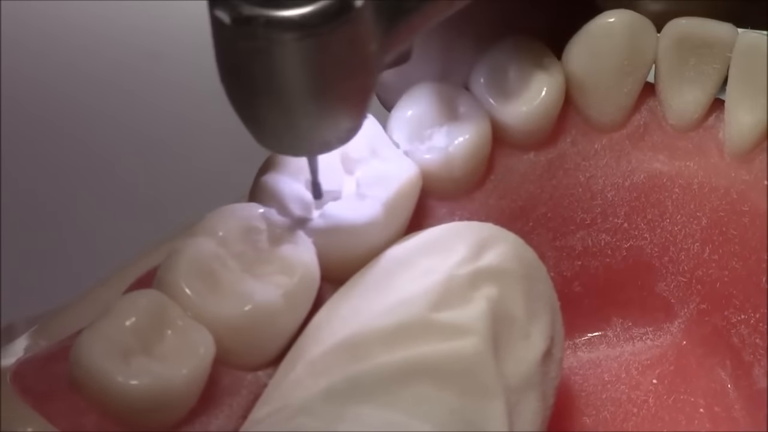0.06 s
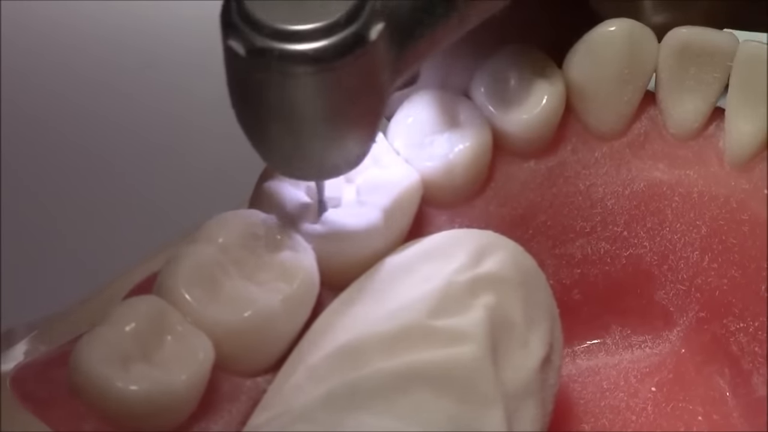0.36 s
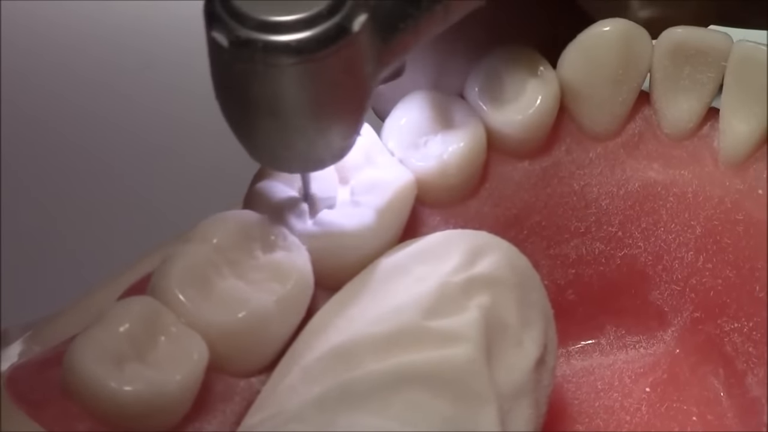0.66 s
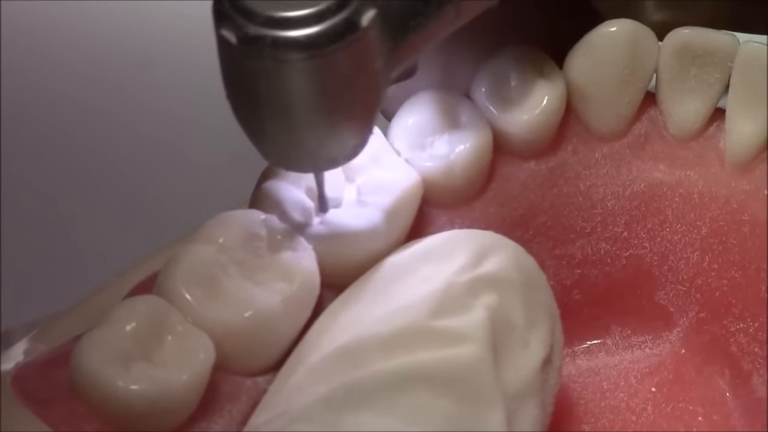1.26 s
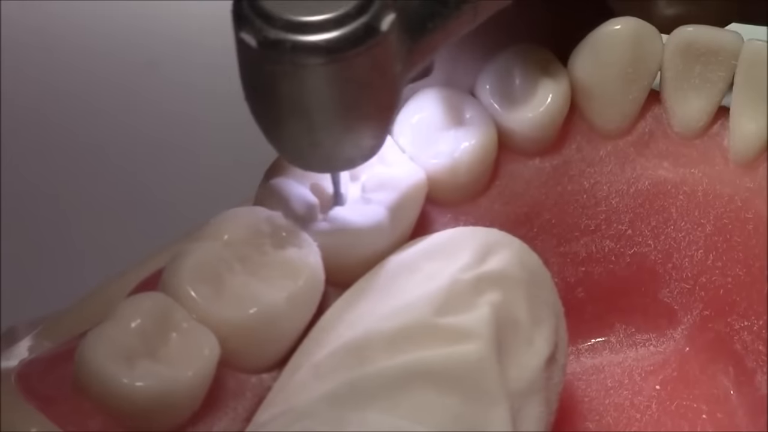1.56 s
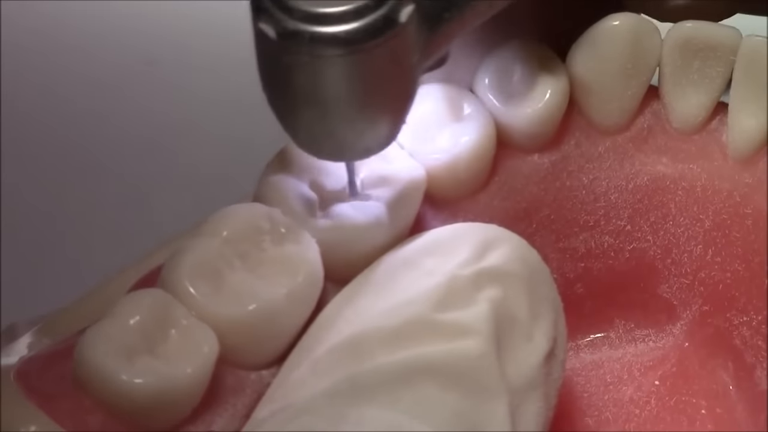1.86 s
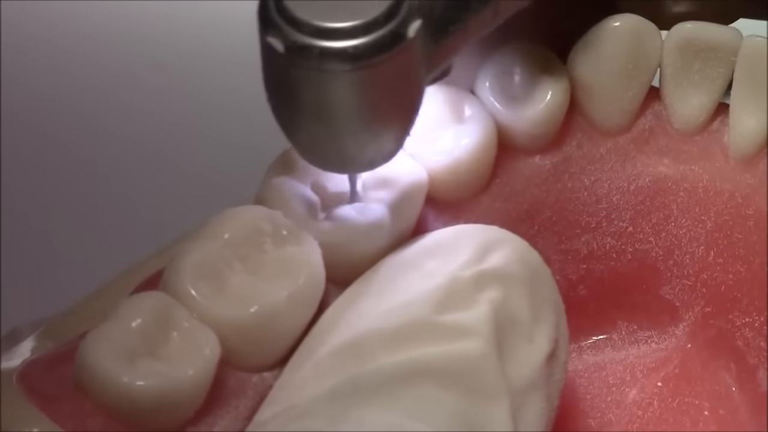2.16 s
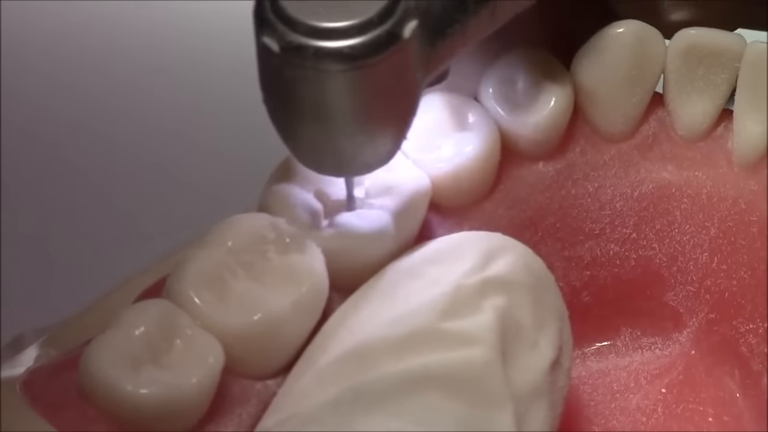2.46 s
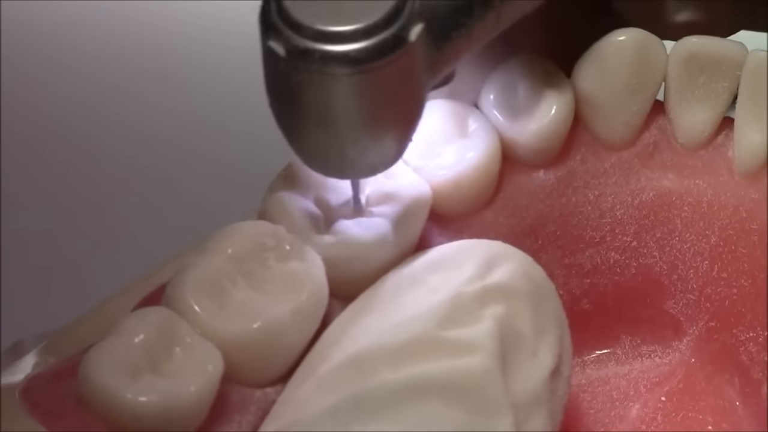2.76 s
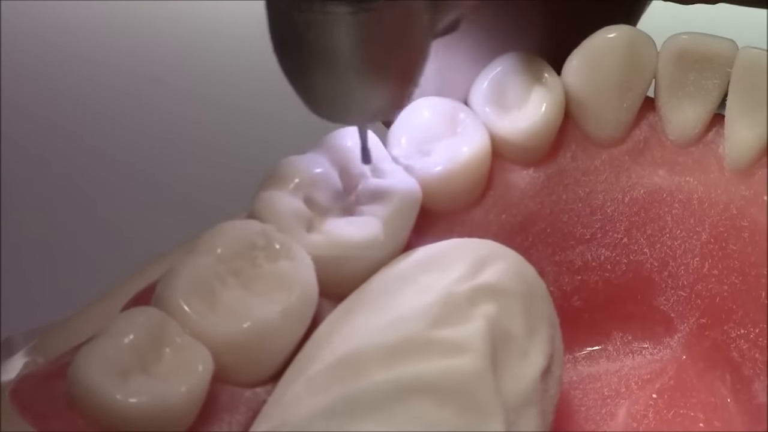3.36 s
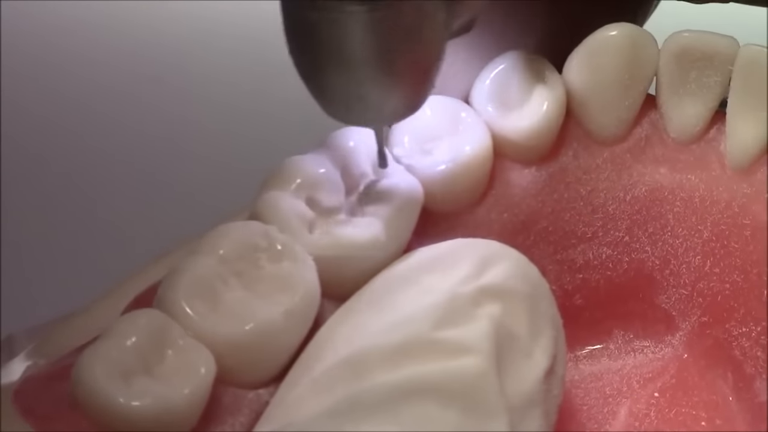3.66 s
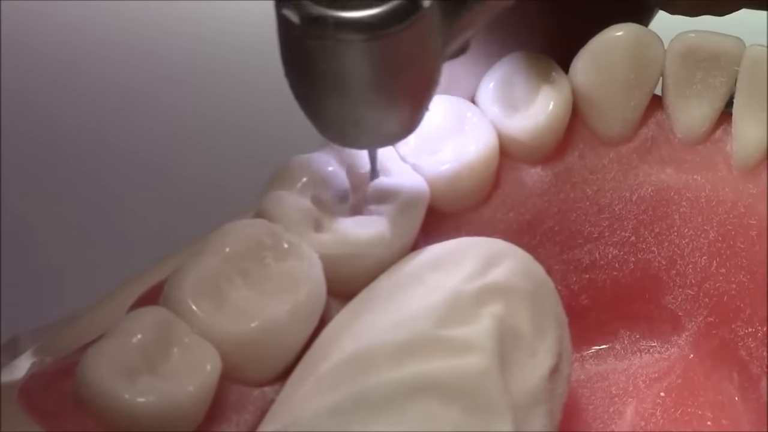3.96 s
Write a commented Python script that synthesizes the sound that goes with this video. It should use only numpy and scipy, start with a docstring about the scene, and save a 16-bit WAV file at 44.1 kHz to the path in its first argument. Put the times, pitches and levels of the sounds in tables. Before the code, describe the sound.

High-pitched dental drill whining and hissing up close, with short grinding bites into a plastic tooth.

```python
"""A high whine near 4.1 kHz with two overtones: an air-turbine dental drill, close to the microphone,
working on a plastic model tooth. Whenever the bur bites, the rotor slows, rings louder and rasps.
Drive air hisses out of the head. Behind it the room carries ventilation and faint machinery,
with a brief low hum early on and one dull knock near the end."""
import sys
import numpy as np
from scipy import signal
from scipy.fft import rfft, irfft
from scipy.io import wavfile

SR = 44100
rng = np.random.default_rng(int(sys.argv[2]) if len(sys.argv) > 2 else 0)


def to_wav(s):
    """Save 16-bit WAV."""
    ch = np.atleast_2d(s).T  # columns
    pcm = np.round(np.clip(ch, -1, 1) * 32767)  # PCM
    wavfile.write(sys.argv[1], SR, pcm.astype(np.int16))


N = 176400
T = np.arange(N) / SR
SIDES = np.array([[1], [-1]])  # added on the left, taken away on the right


def undb(db):
    """Decibels to gain."""
    return 10 ** (np.asarray(db) / 20)


def curve(rows):
    """Join (t/s, value) points by straight lines."""
    return np.interp(T, *np.array(rows, float).T)


def walk(rate_hz):
    """Smooth random motion of spread 1 with a bandwidth of rate_hz."""
    f = np.arange(N // 2 + 1) * SR / N
    y = irfft(rfft(rng.standard_normal(N)) / (1 + (f / rate_hz) ** 2), N)
    return y / y.std()


def noise(spectrum):
    """Noise of rms 1 with the given (f/Hz, relative level/dB) colour, fading beyond both ends."""
    hz, db = np.array(spectrum, float).T
    f = np.maximum(np.arange(N // 2 + 1) * SR / N, 1)
    colour = undb(np.interp(np.log(f), np.log(hz), db))
    skirts = np.minimum(1, hz[-1] / f) ** 2 * np.minimum(1, f / hz[0])
    y = irfft(rfft(rng.standard_normal(N)) * colour * skirts, N)
    return y / y.std()


# rotor speed between bites (t/s, f/Hz)
FREE_SPEED = [(0, 4117), (.07, 4120), (.21, 4138), (.42, 4117), (.75, 4118), (.93, 4103), (1.11, 4106),
              (1.28, 4123), (1.52, 4121), (1.85, 4100), (2.23, 4115), (2.43, 4092), (2.52, 4108),
              (2.6, 4103), (2.7, 4133), (2.86, 4137), (2.94, 4108), (3.12, 4106), (3.21, 4090),
              (3.31, 4104), (3.6, 4100), (3.8, 4108), (4, 4100)]
# the whine's three harmonics at the microphone, between bites (t/s, level/dB)
FUNDAMENTAL_LEVEL = [(0, -13), (.08, -11), (.3, -10.8), (.42, -9.5), (.49, -12.5), (.85, -10), (1.0, -10.5),
                     (1.38, -9), (1.8, -9), (2.22, -9), (2.37, -11), (2.55, -11), (2.68, -13),
                     (2.86, -12.6), (3.0, -11.3), (3.48, -10.5), (3.75, -9.5), (4, -9)]
OCTAVE_LEVEL = [(0, -22), (.2, -22.5), (.45, -19.5), (.7, -21.5), (.8, -23), (.97, -21), (1.15, -23.5),
                (1.35, -21.5), (1.55, -20), (1.91, -19), (1.96, -22), (2.1, -19.5), (2.21, -22.5),
                (2.31, -24), (2.36, -29.5), (2.5, -21.5), (2.58, -22), (2.6, -32), (2.65, -25.5),
                (2.86, -24.5), (3.05, -22), (3.29, -21.5), (3.335, -27), (3.41, -22.5), (3.82, -21.5),
                (4, -19)]
THIRD_LEVEL = [(0, -34), (1.05, -33), (1.2, -30), (1.32, -33), (2.1, -28), (2.4, -32), (2.53, -42),
               (2.63, -28), (2.84, -27), (2.97, -30), (4, -30.5)]
# shaking of the loaded rotor (f/Hz away from the fundamental, relative level/dB)
CHATTER_SPECTRUM = [(25, -12), (70, 2), (180, -2), (400, -19)]


def turbine(slowing_hz, first_db, octave_db, chatter_gain):
    """Close up, three harmonics of the rotor; load drags the speed down and shakes the fundamental."""
    inertia_s = 0.03  # the rotor follows the load late
    memory = np.exp(-1 / (inertia_s * SR))
    drag_hz = signal.lfilter([1 - memory], [1, -memory], slowing_hz)
    hz = curve(FREE_SPEED) - drag_hz + 2.45 * walk(21.5) + 3.4 * walk(123)  # slow wander, quick jitter
    phase = 2 * np.pi * np.cumsum(hz) / SR
    out = chatter_gain * (noise(CHATTER_SPECTRUM) * np.sin(phase)
                          + noise(CHATTER_SPECTRUM) * np.cos(phase))
    level_db = (curve(FUNDAMENTAL_LEVEL) + first_db, curve(OCTAVE_LEVEL) + octave_db, curve(THIRD_LEVEL))
    flutter_db, right_lead_rad = (.41, .88, 1.4), (.1, .06, .02)
    left_db = (1.1 + .025 * (hz - hz.mean()), -.8, .1)  # the fundamental leans right as it slows
    for k in range(3):
        rms = undb(level_db[k] + flutter_db[k] * walk(23) + SIDES * left_db[k] / 2)
        out = out + np.sqrt(2) * rms * np.sin((k + 1) * phase - SIDES * right_lead_rad[k] / 2)
    return out


# the bur meets the tooth (start t/s, length t/s, slowing f/Hz, fundamental boost/dB,
# octave change/dB, rasp level/dB, chatter level/dB)
BUR_BITES = [(-.03, .075, 2.3, 5, 0.5, -42, -42), (0.513, .2, 42, 4.5, 2.5, -39, -29.5),
             (1.127, 0.12, 5.8, 2, -1, -38, -46), (2.12, 0.034, 7, 2, 0.5, -49, -44),
             (2.266, 0.069, 94, 4, 3.5, -28, -29), (2.55, 0.068, 3.6, 2, 3.5, -44, -46),
             (2.872, 0.058, 10.4, 2.5, -3, -31.5, -42), (3.349, 0.051, 23, 3, 8, -36, -38),
             (3.825, 0.072, 12, 1.5, -1.5, -31.5, -44)]


def bites():
    """Bur pressure sets the slowing, the change in two harmonics and the gains of rasp and chatter."""
    ramp_s = 0.03  # pressure builds and eases
    total = np.zeros((5, N))
    for start, length, slowing_hz, first_db, octave_db, rasp_db, chatter_db in BUR_BITES:
        inside_s = np.minimum(T - start, start + length - T)
        pressure = .5 + .5 * np.tanh(2 * inside_s / ramp_s)
        total += np.outer([slowing_hz, first_db, octave_db, undb(rasp_db), undb(chatter_db)], pressure)
    return total


# bur on plastic, close to the microphone (f/Hz, relative level/dB)
RASP_SPECTRUM = [(1000, -28), (1750, -10), (2100, 2), (2500, -3.5), (3100, 6.5), (3700, -7), (4300, 6),
                 (4800, -14), (5700, -9), (7000, -16), (14000, -16)]


def rasp(gain):
    """The bur grinds the tooth: a rough, flickering noise in the centre during each bite."""
    return gain * undb(2.5 * walk(60)) * noise(RASP_SPECTRUM)


# swell of the air leaving the head (t/s, relative level/dB)
AIR_FLOW = [(0, -.5), (.15, -2), (.52, 0), (.78, -1.6), (1.3, 0), (1.85, 1.5), (2.2, 0.7), (2.36, -2.5),
            (2.55, -2.3), (2.8, -2), (3.2, -0.9), (3.6, -1.1), (4, 1.2)]
# its hiss, its rush and the faint stereo width of the hiss (f/Hz, relative level/dB)
HISS_SPECTRUM = [(3000, -30), (6200, -17), (6480, -8), (6750, -9.5), (7900, -8.5), (9000, -3.3), (9350, -3),
                 (9950, 0), (10300, -2.5), (10700, -1), (11700, -7.5), (12150, -5.5), (12750, -11),
                 (13150, -17), (13600, -15.5), (14050, -11), (14450, -16.5), (14850, -13.5), (15100, -18.5),
                 (15350, -11.5), (15550, -16), (15800, -15)]
RUSH_SPECTRUM = [(400, -35.5), (900, -11), (1300, -7), (1620, 0.5), (1880, -4), (2080, -1), (2600, -3.5),
                 (3180, 1.5), (3700, -1), (4050, -0.5), (4230, 6.5), (4700, -2.5), (5200, 2), (5750, -1.5),
                 (6200, -3), (8000, -13), (14000, -28)]
HISS_WIDTH_SPECTRUM = [(3500, -40), (4300, -11), (6000, -28.5), (6600, -10), (7700, 15), (9000, 15),
                       (10200, -5.5), (11000, -11), (12300, 4), (15000, 7)]


def air():
    """Exhaust air at close range: a bright hiss and a lower rush coloured by the handpiece's hollows."""
    hiss = undb(-22 + 0.34 * walk(11)) * noise(HISS_SPECTRUM)
    rush = undb(-29 + 0.89 * walk(5.8)) * noise(RUSH_SPECTRUM)
    width = undb(-46.5) * noise(HISS_WIDTH_SPECTRUM) * SIDES
    return undb(curve(AIR_FLOW)) * (hiss + rush + width)


# room tone behind the drill (t/s, level/dB)
VENT_LEVEL = [(0, -41.5), (1.3, -41), (1.9, -39.5), (2.2, -41), (2.4, -44.5), (2.8, -42.5), (3.2, -41.5),
              (4, -40)]
# its colour and its stereo width (f/Hz, relative level/dB)
VENT_SPECTRUM = [(15, -55), (25, -25), (64, -19.5), (117, -2.5), (220, -0.5), (249, 1), (361, 0),
                 (396, 3.5), (441, -2.5), (499, 3.5), (548, -4.5), (723, -1.5), (926, -10), (1000, -6),
                 (1300, -9), (2200, -120)]
VENT_WIDTH_SPECTRUM = [(25, -21), (70, -13), (125, -3), (200, 5), (300, 1), (500, -7), (800, -26)]


def ventilation():
    """Ventilation fills the room with low noise, nearly alike on both sides."""
    width = undb(-20.5) * noise(VENT_WIDTH_SPECTRUM) * SIDES
    return undb(curve(VENT_LEVEL)) * (noise(VENT_SPECTRUM) + width)


# tones of machinery in the room (f/Hz, level/dB)
MACHINE_TONES = [(184, -59), (393, -68), (514, -57.5), (706, -61.5), (1008, -58), (1082, -56.5),
                 (1631, -57), (2060, -54.5), (2476, -52), (3268, -61), (5737, -44)]


def machinery():
    """Running machinery hums in the background, each tone wavering slightly in pitch."""
    out = np.zeros(N)
    for hz, db in MACHINE_TONES:
        wavering_hz = hz * (1 + .002 * walk(11.95))
        out += undb(db) * np.sqrt(2) * np.sin(2 * np.pi * np.cumsum(wavering_hz) / SR)
    return out


def low_hum(start_s=.45, length_s=.22, hz=275, fall_hz=18, peak_db=-37):
    """Under the drill, a faint low tone swells and fades while its pitch sinks."""
    progress = np.clip((T - start_s) / length_s, 0, 1)
    phase = 2 * np.pi * np.cumsum(hz - fall_hz * progress) / SR
    return undb(peak_db) * np.sin(np.pi * progress) * np.sin(phase)


def knock(start_s=3.553, hz=580, gain_db=-30, attack_s=.0055, t60_s=.09):
    """One soft, quickly damped knock somewhere in the room."""
    age = np.maximum(T - start_s, 0)
    envelope = (1 - np.exp(-age / attack_s)) * np.exp(-np.log(1000) * age / t60_s)
    return undb(gain_db) * envelope * np.sin(2 * np.pi * hz * age)


def scene():
    """The drill right at the microphone, the room behind it."""
    slowing_hz, first_db, octave_db, rasp_gain, chatter_gain = bites()
    drill = turbine(slowing_hz, first_db, octave_db, chatter_gain) + rasp(rasp_gain) + air()
    return drill + ventilation() + machinery() + low_hum() + knock()


def record(dry):
    """The recorder cuts the top steeply above 15.65 kHz."""
    return signal.sosfilt(signal.ellip(12, .1, 80, 15650, fs=SR, output="sos"), dry)


dry = scene()
out = record(dry)
to_wav(out)
```